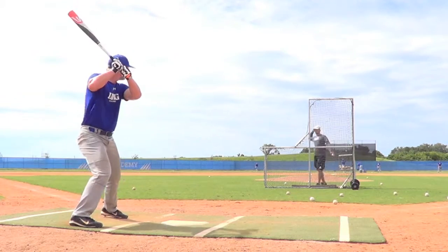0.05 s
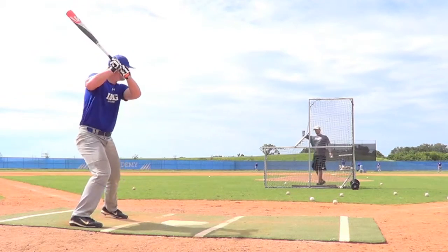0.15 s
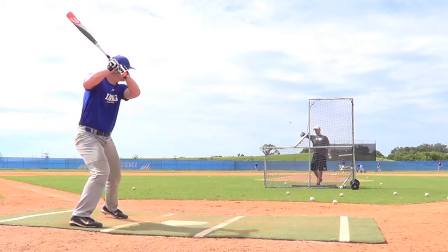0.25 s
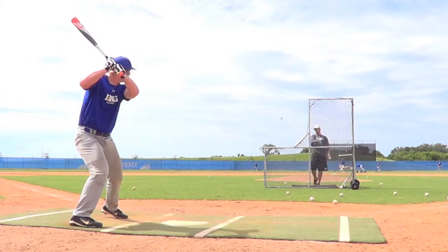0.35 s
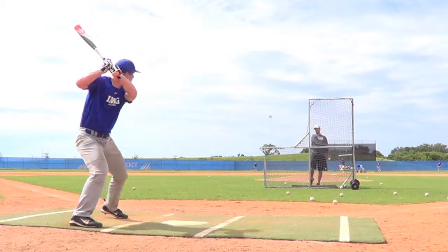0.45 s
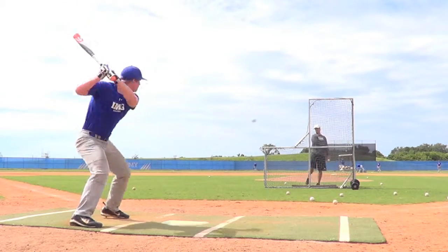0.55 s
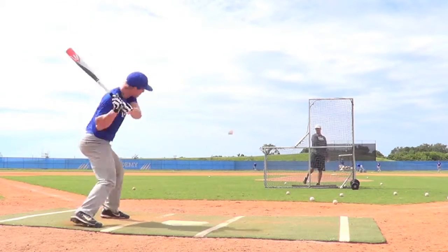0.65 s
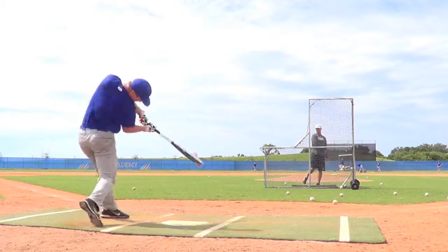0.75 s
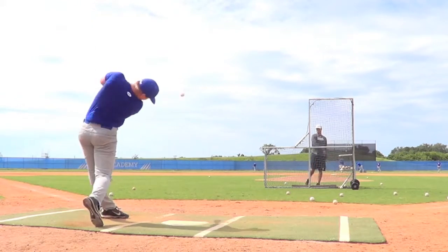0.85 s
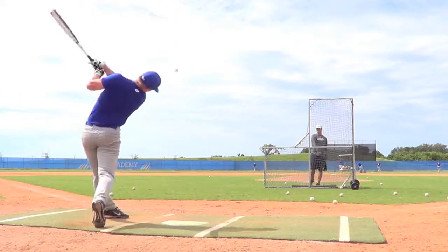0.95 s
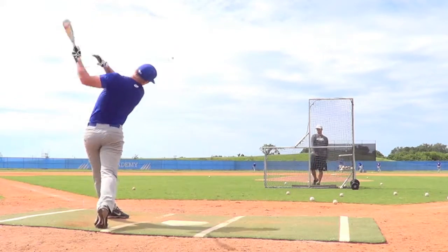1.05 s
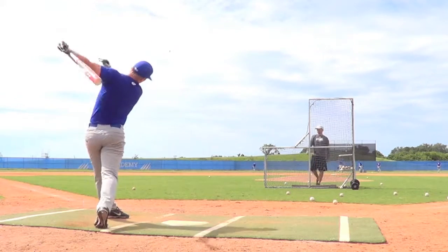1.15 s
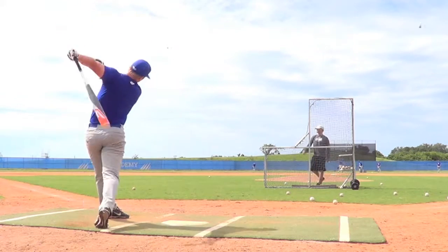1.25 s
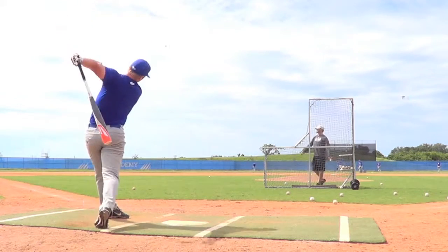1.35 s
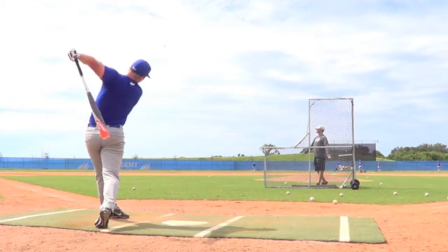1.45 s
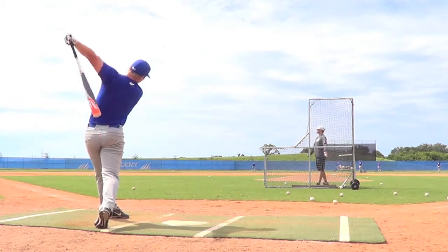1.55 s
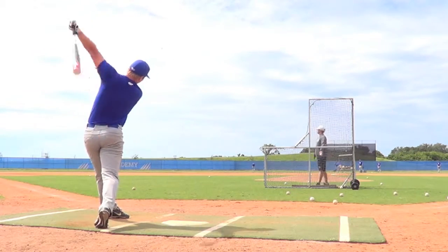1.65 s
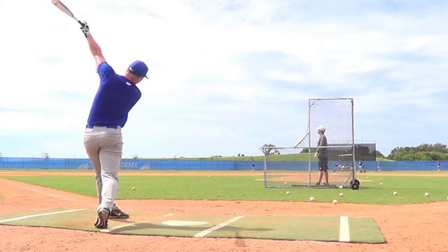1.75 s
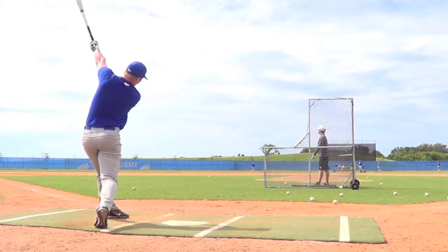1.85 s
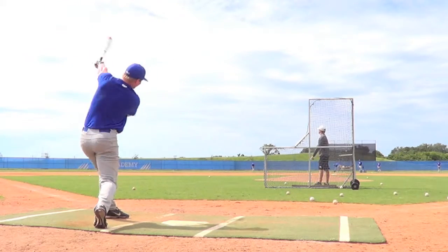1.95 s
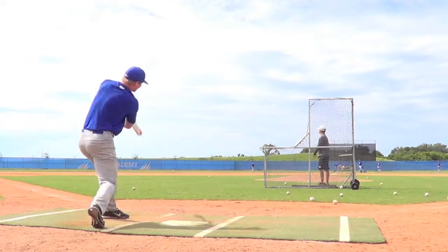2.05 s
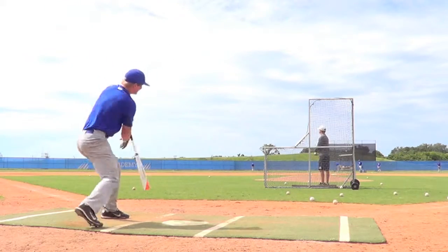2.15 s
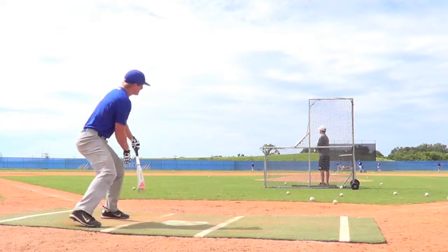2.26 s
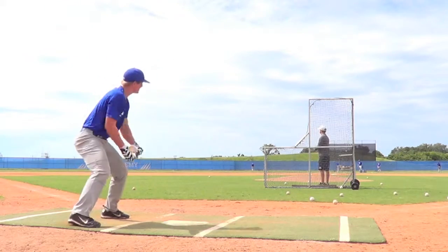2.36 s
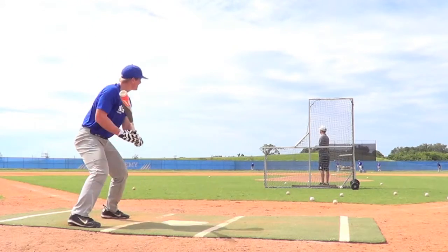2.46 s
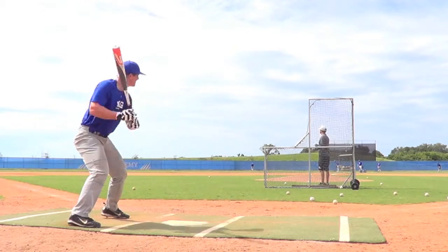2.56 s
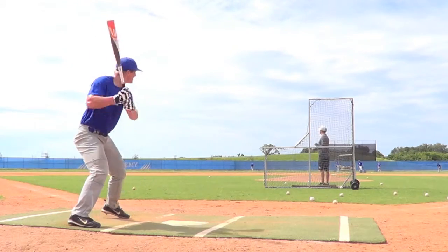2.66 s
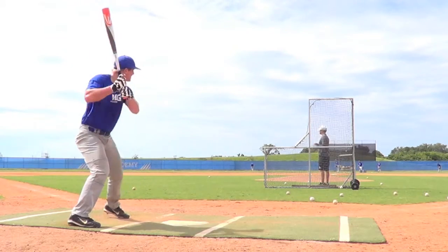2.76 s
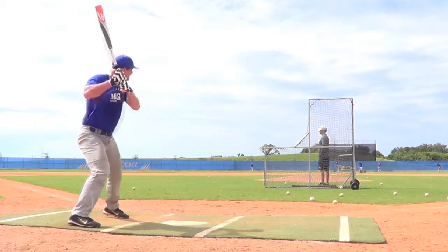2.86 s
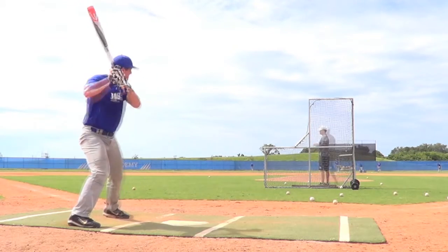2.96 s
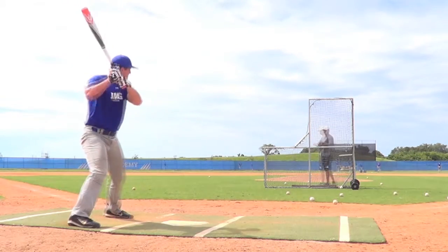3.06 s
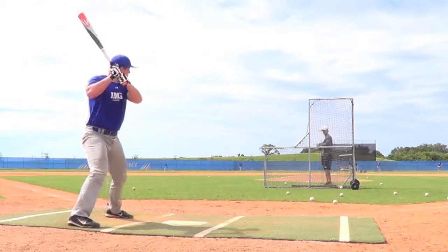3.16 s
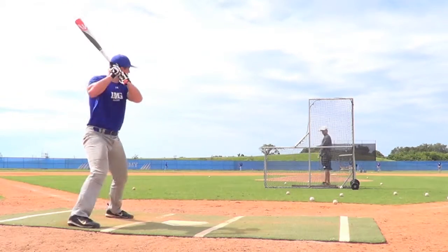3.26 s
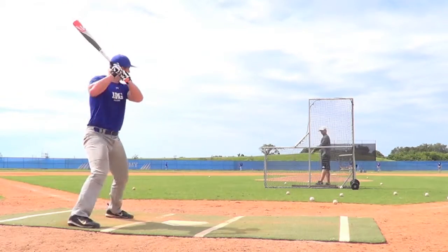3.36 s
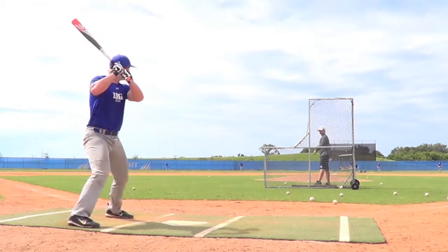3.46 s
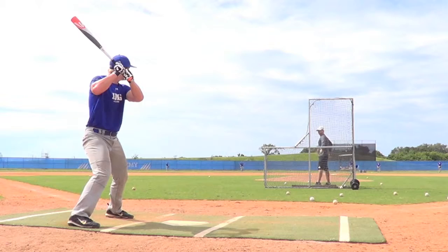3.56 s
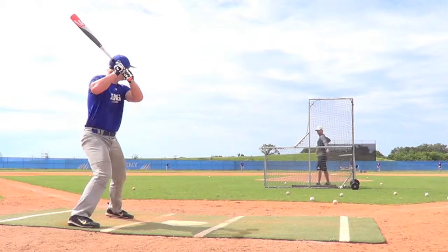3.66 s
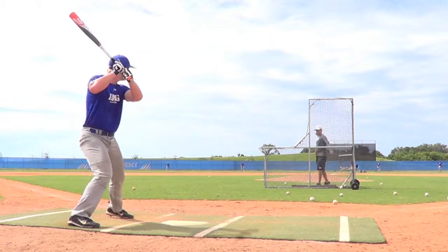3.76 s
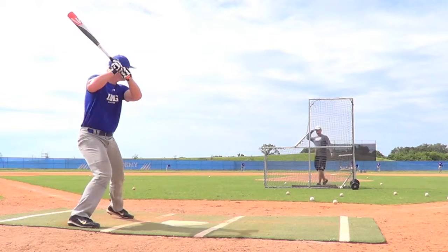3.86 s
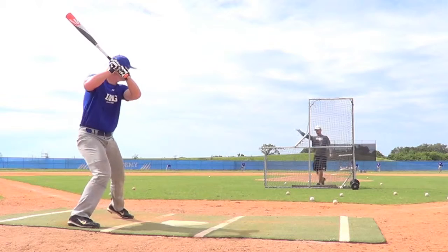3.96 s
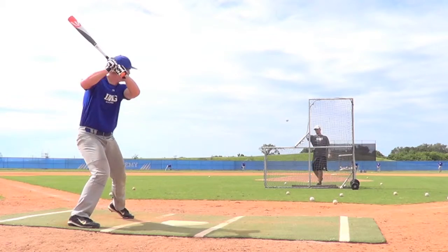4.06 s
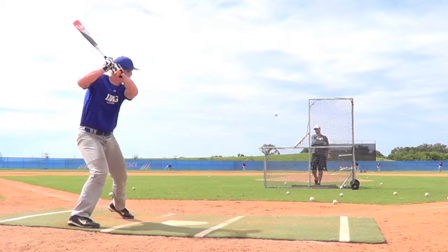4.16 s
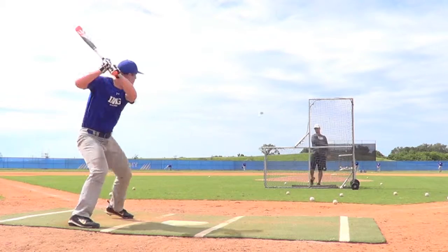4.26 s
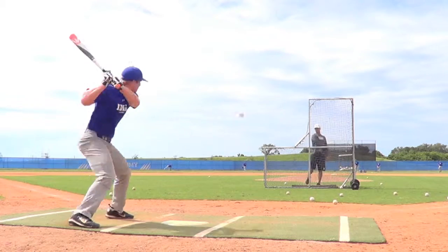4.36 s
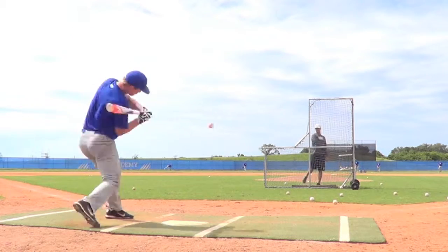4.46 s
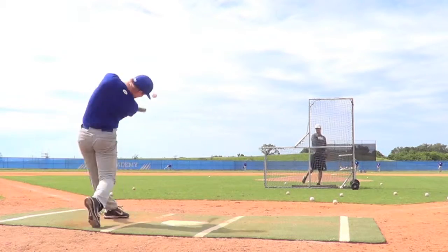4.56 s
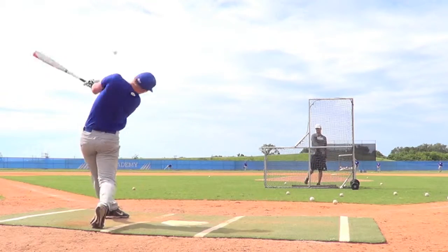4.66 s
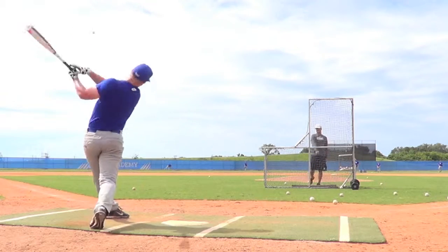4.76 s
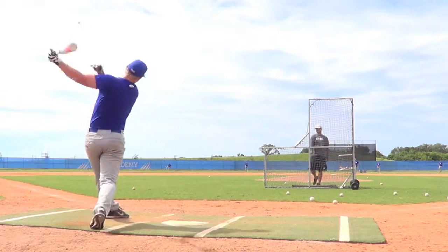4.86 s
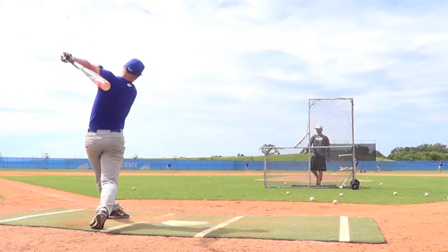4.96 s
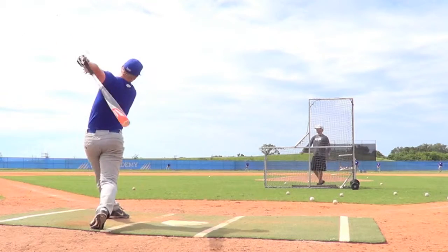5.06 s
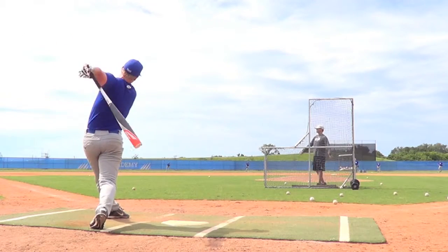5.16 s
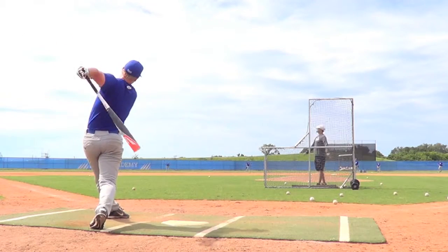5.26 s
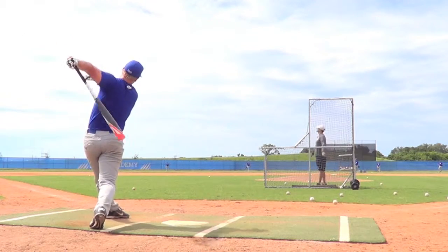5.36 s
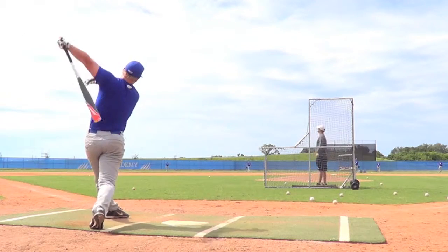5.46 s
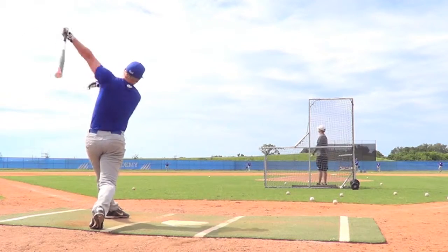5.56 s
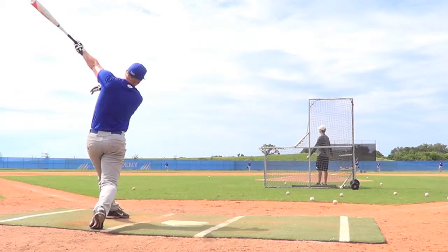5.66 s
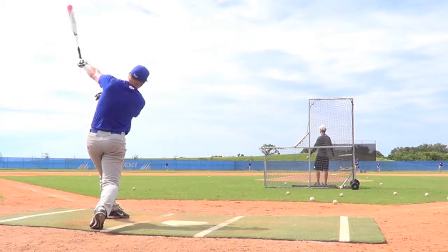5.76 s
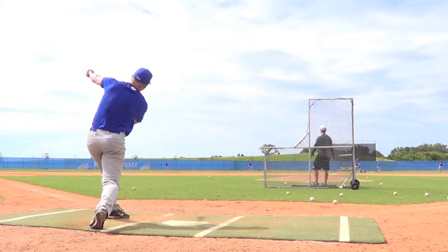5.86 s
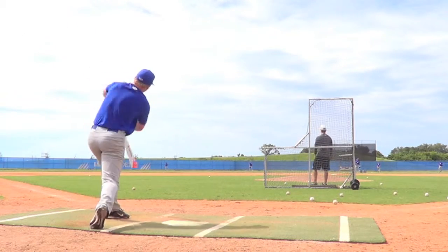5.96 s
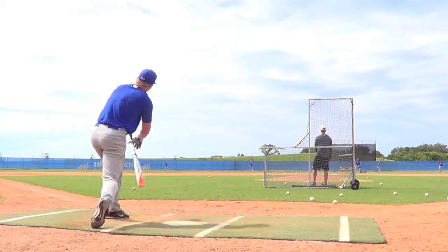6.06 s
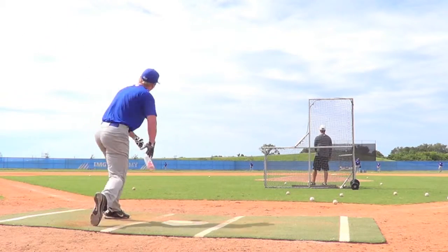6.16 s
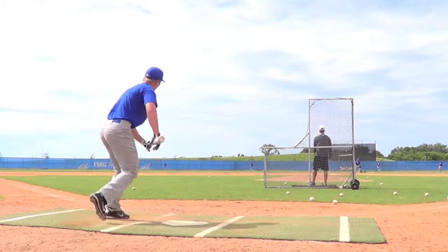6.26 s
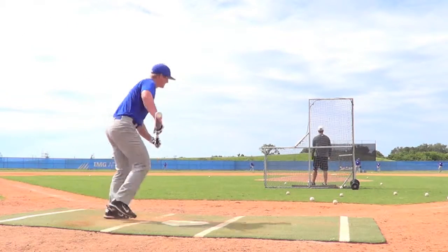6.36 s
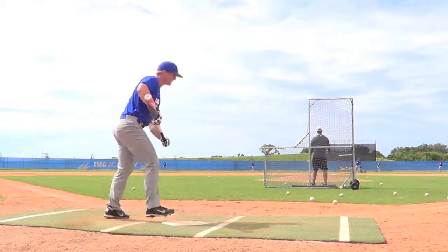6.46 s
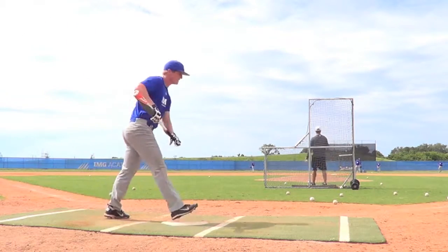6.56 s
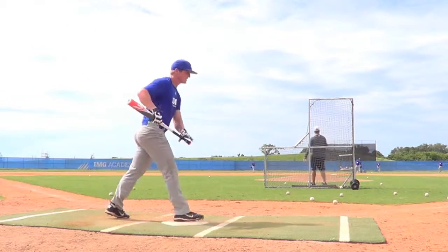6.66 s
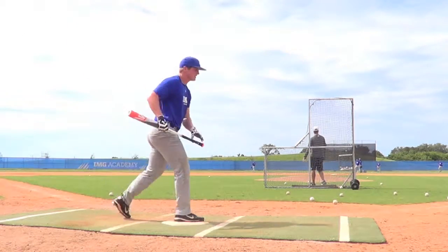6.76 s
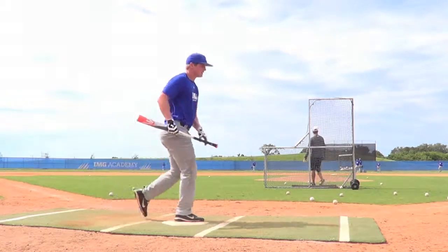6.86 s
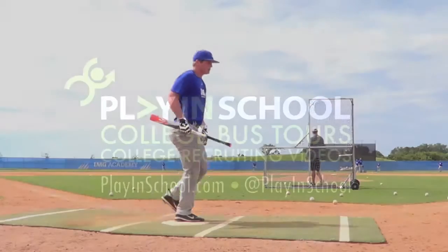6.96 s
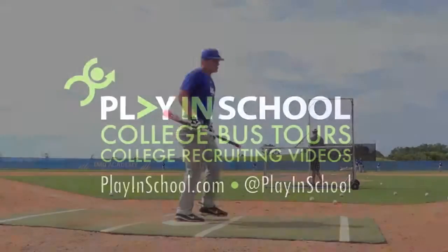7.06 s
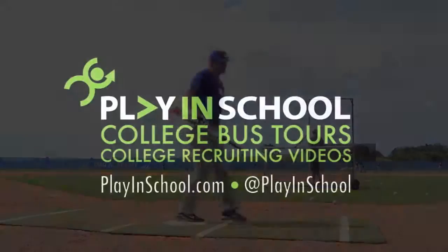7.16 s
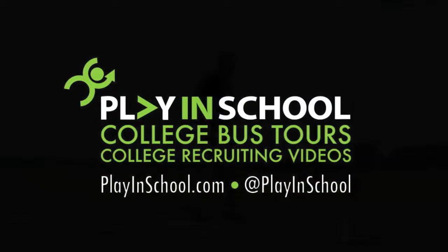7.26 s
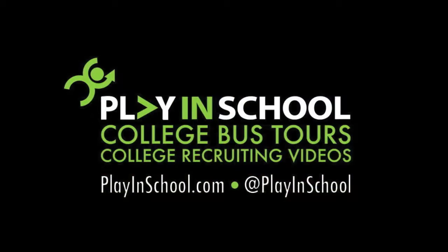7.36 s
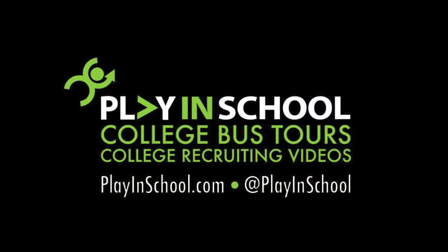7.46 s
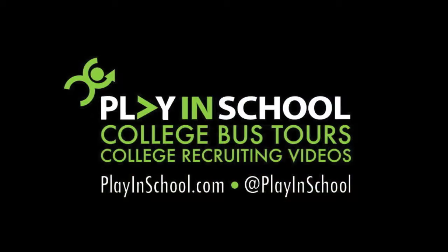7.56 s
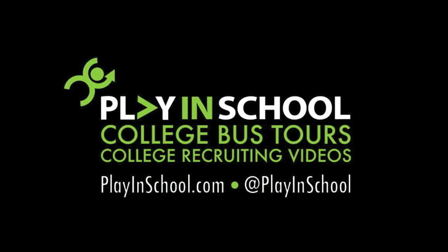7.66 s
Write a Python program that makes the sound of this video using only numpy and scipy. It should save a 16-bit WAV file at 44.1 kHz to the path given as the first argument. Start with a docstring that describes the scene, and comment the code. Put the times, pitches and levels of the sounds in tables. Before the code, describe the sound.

On an open field a batter's soles scuff a gritty mat, then a metal bat hits a ball with a loud crack and high ping, answered by fences and distant walls. Wind thumps and flutters on the microphone. A small metal clack sounds to the right, then a second scrape and hit follow. A bird chirps late, shoes step, and the sound fades.

```python
"""An open field at batting practice: a metal bat hits two balls, and fences and far walls answer each ping.
The bat is a sum of decaying modes with an impact crack; echoes are delayed, smeared and Doppler-shifted copies.
Shoes scrape on a gritty mat and something metal clacks off to the right: shaped noise and struck resonances.
Birds chirp as gliding tones; wind buffets the microphone as noise that grows with the flow.
A limiter ducks the mix under its loudest peaks, and the sound fades out at the end."""
import sys
import numpy as np
from scipy import signal
from scipy.fft import rfft, irfft, next_fast_len
from scipy.io import wavfile
from scipy.ndimage import uniform_filter1d, minimum_filter1d, map_coordinates

SR = 44100
rng = np.random.default_rng(int(sys.argv[2]) if len(sys.argv) > 2 else 0)


def wav_out(sig):
    """Save sig, one row per channel (or a flat mono array), as 16-bit PCM at SR to the path in sys.argv[1]."""
    wavfile.write(sys.argv[1], SR, np.round(np.clip(np.atleast_2d(sig).T, -1, 1) * 32767).astype(np.int16))


N = 339570
T = np.arange(N) / SR


def amp(db):
    """Level definition: decibels to amplitude gain."""
    return 10 ** (np.asarray(db) / 20)


def unit(x):
    """Normalisation to rms 1."""
    return x / np.sqrt(np.mean(x ** 2) + 1e-20)


def along(points, hz):
    """Interpolation of (f/Hz, value) points on a logarithmic frequency axis."""
    f, v = np.transpose(points)
    return np.interp(np.log(hz + 1), np.log(f + 1), v)


def curve(points):
    """Linear interpolation of (t/s, value) points, one value per sample."""
    s, value = np.transpose(points)
    return np.interp(T, s, value)


def random_offset(rate):
    """Random offset: a random value that stays almost constant through the sound."""
    knots = rng.standard_normal(int(N * rate / SR) + 4)
    return map_coordinates(knots, [T * rate / SR], order=2)


def filtered(x, response):
    """Linear filtering: the spectrum of x times a response of frequency."""
    n = x.shape[-1]
    m = next_fast_len(n + 8192)
    return irfft(rfft(x, m) * response(np.fft.rfftfreq(m, 1 / SR)), m)[..., :n]


def colour(x, spectrum):
    """Spectral shaping by (f/Hz, level/dB) points, brought to rms 1."""
    return unit(filtered(x, lambda hz: amp(along(spectrum, hz))))


def grains(n, spiky_db, width=0.24):
    """Granular noise: a stereo train of tiny impacts whose size varies from group to group."""
    size = np.repeat(rng.standard_normal(n // 32 + 1), 32)[:n]
    mid, side = rng.standard_normal((2, n)) * amp(spiky_db * size)
    return unit(np.array([mid + width * side, mid - width * side]))


def pan(db):
    """Interchannel level difference: left and right gains, positive to the left."""
    return amp([[db / 2], [-db / 2]])


def bell(t, centre, spread):
    """Gaussian envelope of height 1, down to 1/e at twice the spread from its centre."""
    return np.exp(-np.minimum(((t - centre) / spread / 2) ** 2, 50))


def add(track, s, sound):
    """Superposition: mix a sound into a track at time s."""
    part = track[..., max(round(s * SR), 0):][..., :sound.shape[-1]]
    part += sound[..., :part.shape[-1]]


def field(x, db, t60):
    """Diffuse scattering: convolution with exponentially decaying noise that builds up smoothly."""
    t = T[:SR]
    tail = rng.standard_normal((2, SR)) * amp(-60 * t / t60) * (1 - np.exp(-(t / 0.024) ** 2))
    return amp(db) * signal.fftconvolve(x, tail / np.linalg.norm(tail[0]), axes=1)[:, :N]


def burst(spectrum, t60, rough):
    """Minimum-phase impulse with a brief ragged tail, in energy equal to 4 ms at rms 1."""
    t = T[:4096]
    cepstrum = irfft(np.log(amp(along(spectrum, np.fft.rfftfreq(len(t), 1 / SR)))))
    # folding the cepstrum forward in time puts the energy at the onset
    cepstrum[1:len(t) // 2] *= 2
    cepstrum[len(t) // 2 + 1:] = 0
    tail = rng.standard_normal(len(t)) * amp(-60 * t / t60)
    ragged = 1 + rough * rfft(tail) / np.linalg.norm(tail)
    out = irfft(np.exp(rfft(cepstrum)) * ragged)
    return out / np.linalg.norm(out) * np.sqrt(.004 * SR)


# spectrum of the open-air hiss: (f/Hz, relative level/dB)
AIR_SPECTRUM = [(530, -2.5), (900, -4.5), (1020, -6.5), (3610, -16), (4160, -17.5), (7940, -21),
                (9700, -20.5), (12900, -24.5), (14000, -22), (15000, -40)]
# course of the hiss, before a small random offset: (t/s, level/dB)
AIR_COURSE = [(0, -44), (.7, -50), (1.7, -52), (2.4, -48.5), (3.1, -54.5), (3.5, -50.5), (7, -52)]
WHINE_HZ = 15734


def air():
    """Broadband background noise: faint hiss, a far insect band that dies away, and a thin high whine."""
    mid, side = colour(rng.standard_normal((2, N)), AIR_SPECTRUM)
    side_tone = [(1000, 1.5), (4000, -2.5), (8000, -5.0), (12000, -41.5)]
    side = filtered(side, lambda hz: amp(along(side_tone, hz)))
    hiss = amp(curve(AIR_COURSE) + 0.83 * random_offset(5)) * np.array([mid + side, mid - side])
    insect_tone = [(3600, -38), (4100, 1.5), (4350, 2), (5000, -34)]
    insect = amp(-58.0) * bell(T, 0.28, 0.22) * colour(rng.standard_normal((2, N)), insect_tone)
    whine = amp(-55.5) * np.sin(2 * np.pi * WHINE_HZ * T + .4 * random_offset(12))
    return hiss + insect + whine


def puffs(count, life):
    """Shot process: small eddies arrive at random and die exponentially."""
    kicks = np.bincount(rng.integers(0, N, count), rng.uniform(0.47, 1, count), N)
    t = T[:SR // 10]
    return signal.fftconvolve(kicks, np.exp(-t / life) * (1 - np.exp(-t / 0.0022)))[:N]


HOWL_DB, HOWL_GROWS = -44, 1.37  # level in a plain breeze; dB gained per dB of wind strength
HOWL_HZ, HOWL_HZ_PER_DB, HOWL_WIDTH_HZ = 617.3, 16, 178
HOWL_OFFSET_HZ = 55  # scale of the random offset of its pitch


def howl(strength_db):
    """Vortex shedding at edges: a hollow noise band climbs in pitch and level with the wind."""
    centre_hz = HOWL_HZ + HOWL_HZ_PER_DB * strength_db + HOWL_OFFSET_HZ * random_offset(9)
    narrow = filtered(rng.standard_normal((2, 2, N)), lambda hz: 1 / (1 + (hz / HOWL_WIDTH_HZ) ** 2))
    in_phase, quadrature = narrow
    phase = 2 * np.pi * np.cumsum(centre_hz) / SR
    band = in_phase * np.cos(phase) + quadrature * np.sin(phase)
    offset_gain = amp(2.5 * random_offset(11) + 1.2 * random_offset(45))
    return amp(HOWL_DB + HOWL_GROWS * strength_db) * unit(offset_gain * band)


# course of the wind: (t/s, strength level/dB)
WIND_COURSE = [(0.0, -47.5), (0.63, -50.5), (0.8, -48), (0.98, -37.5), (1.16, -36.5), (1.45, -53),
               (1.77, -47.5), (2.33, -42.5), (2.61, -47.5), (3.06, -41.5), (3.42, -36), (4.42, -32),
               (4.81, -38.5), (5.3, -31), (5.54, -34.5), (6.66, -28), (6.83, -38.5), (7.05, -34)]
# short gusts and lulls: (t/s, spread t/s, lift level/dB)
GUST_LIFTS = [(0.24, 0.0056, 11), (1.132, 0.016, 8), (1.247, 0.047, 3.5), (1.316, 0.026, 8),
              (1.51, 0.072, 8.5), (1.722, 0.0069, 15), (1.805, 0.014, 14), (2.166, 0.023, 11),
              (2.34, 0.046, 6), (1.98, 0.013, 7), (2.72, 0.079, 1), (2.86, 0.0089, -3), (3.3, 0.02, 5.5),
              (3.57, 0.015, 3.5), (3.81, 0.035, 2.5), (3.962, 0.0091, -6), (5.244, 0.025, 1.5),
              (5.56, 0.019, -8), (6.183, 0.014, -2.5), (6.79, 0.034, 6.5), (7.137, 0.0062, 9)]
# spectrum of the low rumble: (f/Hz, relative level/dB)
BUFFET_SPECTRUM = [(12, -45), (20, -12.5), (59, -0.5), (165, 2), (450, -18.5), (580, -24.5), (990, -120)]
# spectrum of the higher flutter: (f/Hz, relative level/dB)
FLUTTER_SPECTRUM = [(140, -3.5), (265, 5.5), (420, -2), (650, -5.5), (900, -16), (1400, -23.5),
                    (2400, -36.5), (5000, -48.5)]
# spectrum of a hard eddy: (f/Hz, relative level/dB)
EDDY_SPECTRUM = [(150, -8.5), (400, 14.5), (1000, -1.5), (2000, -25.5), (4000, -45), (8000, -53)]
# big eddies thumping the microphone: (t/s, level/dB, f/Hz)
EDDY_THUMPS = [(0.237, -11.5, 132), (0.99, -13.5, 158), (1.104, -16.5, 184), (1.128, -13, 234),
               (1.141, -21, 261), (1.228, -14.5, 165), (1.266, -15.5, 199), (1.306, -10, 171),
               (1.726, -15.5, 168), (1.788, -11, 180), (1.822, -11, 204), (2.16, -31.5, 143),
               (2.866, -10.5, 139), (3.224, -13.5, 175), (3.265, -11.5, 188), (3.29, -11.5, 127),
               (3.77, -13, 143), (3.829, -21.5, 175), (5.221, -11, 195), (5.256, -14.5, 195),
               (5.289, -14, 137), (5.334, -17.5, 168), (5.713, -9, 176), (6.741, -15, 207),
               (6.768, -9.5, 187), (6.785, -9, 255), (6.977, -14, 140), (7.13, -12.5, 176)]
# small fast eddies popping on it: (t/s, level/dB)
EDDY_POPS = [(0.2143, -25.5), (1.104, -24.5), (1.1399, -22), (1.2297, -28), (1.2593, -25.5), (1.321, -24.5),
             (1.787, -28), (2.868, -33.5), (3.2342, -26), (3.237, -20.5), (3.259, -27.5), (3.2644, -23),
             (3.6215, -30.5), (3.7754, -27.5), (4.204, -30), (4.378, -32.5), (5.4375, -27.5),
             (5.963, -28.5), (6.035, -24.5), (6.09, -29.5), (6.151, -32), (6.2, -36.5), (6.4145, -27),
             (6.4868, -22.5), (6.684, -22), (6.7382, -22.5), (6.7898, -18), (6.7997, -21), (6.8488, -22)]
# side against mid, before a common factor of 0.9: (f/Hz, level/dB)
SIDE_WIDTH = [(60, -8), (110, -8.5), (200, -3), (380, 1), (700, 4.5), (1290, 3), (2380, 1.5), (4400, -13),
              (8120, -8.5), (15000, -42)]
BREEZE_DB, BUFFET_KNEE_DB = -35, -31  # plain breeze; strength above which the rumble grows no more
BUFFET_DB, BUFFET_GROWS = -28, 0.47  # level in a plain breeze; dB gained per dB of strength
FLUTTER_DB, FLUTTER_GROWS = -33, 1.2  # the flutter rises much more steeply
STRAY_EDDY_DB, STRAY_EDDY_LIFE_S = -3, 0.0017  # lesser random eddies, relative to the flutter
THUMP_SPREAD_S = 0.0018


def wind():
    """Turbulent pressure on the microphone ports: rumble, flutter, howl, and eddies that thump and pop."""
    flow_db = curve(WIND_COURSE) - BREEZE_DB
    lift_db = sum(db * bell(T, s, spread) for s, spread, db in GUST_LIFTS)
    rumble_flow_db = np.minimum(flow_db, BUFFET_KNEE_DB - BREEZE_DB)
    buffet = amp(BUFFET_DB + BUFFET_GROWS * rumble_flow_db + lift_db)
    flutter = amp(FLUTTER_DB + FLUTTER_GROWS * flow_db + lift_db)
    strays = amp(STRAY_EDDY_DB) * flutter * puffs(count=40, life=STRAY_EDDY_LIFE_S)
    common_offset = random_offset(24)  # shared by rumble and flutter

    def noise(spectrum):
        return colour(rng.standard_normal((2, N)), spectrum)

    low_gain = amp(2.2 * common_offset + 1.1 * random_offset(62))
    low = buffet * unit(low_gain * noise(BUFFET_SPECTRUM))
    high_gain = amp(1.6 * common_offset + .8 * random_offset(9))
    high_puffs = .4 + puffs(count=600, life=0.0036)
    high = flutter * unit(high_gain * high_puffs * noise(FLUTTER_SPECTRUM))
    shared, own = low + high + howl(flow_db) + strays * noise(EDDY_SPECTRUM)
    t = T[:SR // 10] - .05  # time about the centre of a thump
    for s, db, hz in EDDY_THUMPS:
        add(shared, s + t[0], amp(db) * bell(t, 0, THUMP_SPREAD_S) * np.sin(2 * np.pi * hz * t))
    for s, db in EDDY_POPS:
        add(shared, s, amp(db) * burst(EDDY_SPECTRUM, t60=0.025, rough=.6))
    # the same eddy reaches the left port first, so the side signal is a quarter turn ahead
    side = filtered(shared, lambda hz: .9j * amp(along(SIDE_WIDTH, hz)))
    own_tone = [(60, -12.5), (300, -13.0), (1000, -21.5)]
    side += filtered(own, lambda hz: amp(along(own_tone, hz)))
    return np.array([shared + side, shared - side])


# bird notes, before a small random level offset: (t/s, length t/s, start f/Hz, end f/Hz, level/dB)
BIRD_NOTES = [(4.312, 0.047, 6400, 6430, -62), (4.942, 0.073, 6470, 6170, -54),
              (5.458, 0.036, 6350, 6470, -52.5), (6.323, 0.061, 2740, 3310, -32),
              (6.37, 0.034, 3650, 3730, -48.5), (6.422, .025, 6550, 6700, -56),
              (6.732, 0.037, 6550, 6300, -51)]
GLIDE_START, GLIDE_END = 0.225, .85  # shares of a note between which its pitch glides


def birds():
    """Frequency modulation: whistles hold, then glide, with a weak octave; two echoes and scatter follow."""
    out = np.zeros((2, N))
    for s, length, start_hz, end_hz, db in BIRD_NOTES:
        u = np.linspace(0, 1, int(length * SR))
        glide = np.clip((u - GLIDE_START) / (GLIDE_END - GLIDE_START), 0, 1)
        phase = 2 * np.pi * np.cumsum(start_hz + (end_hz - start_hz) * glide) / SR
        swell = np.abs(np.sin(np.pi * u)) ** 1.4
        whistle = np.sin(phase) + amp(-24) * np.sin(2 * phase)
        note = amp(db + 1.5 * random_offset(150)[:len(u)]) * swell * whistle
        for delay, echo_db in [(0, 0), (.05, -11.5), (.11, -20)]:
            add(out, s + delay, amp(echo_db) * note)
    return out + field(out, db=-10, t60=0.45)


# quick metal contacts: (t/s, level/dB, decay time t60/s)
CLACK_BLOWS = [(3.9147, -31.5, 0.026), (3.921, -30.5, 0.039), (3.9248, -33.5, 0.06), (3.938, -42, 0.2)]
# resonances of the small metal thing: (f/Hz, bandwidth f/Hz, relative level/dB)
CLACK_MODES = [(2970, 59, -6), (3800, 110, -4), (4380, 37, -2.5), (5030, 91, -10), (5120, 30, -10),
               (5750, 81, -5.5), (5920, 44, -18), (6200, 63, 1), (7290, 28, -8), (7590, 96, -5.5),
               (8140, 38, -13), (8500, 31, -3), (9580, 75, -3.5), (10600, 32, -5)]


def clack_response(f):
    """Modal superposition: parallel resonances of alternating sign."""
    total = 0
    for k, (centre, width, db) in enumerate(CLACK_MODES):
        resonance = 1j * f * width / (centre * centre - f * f + 1j * f * width)
        total = total + (-1) ** k * amp(db) * resonance
    return total / np.sqrt(np.mean(abs(total) ** 2))


# spectrum of the contact itself: (f/Hz, relative level/dB)
CONTACT_SPECTRUM = [(2000, -26), (2600, -3.5), (2900, -1), (6500, 0.5), (10600, -5.5), (12000, -16),
                    (15000, -21)]
# dull repeats from walls: (delay t/s, level/dB)
WALL_REPEATS = [(0.067, -12), (0.096, -7)]


def clack():
    """Forced resonance: quick contacts snap and ring a small metal thing; two walls repeat it, duller."""
    blows = np.zeros(N)
    for s, db, t60 in CLACK_BLOWS:
        add(blows, s, amp(db - 60 * T[:SR // 2] / t60))
    ring = amp(-2) * filtered(blows * grains(N, spiky_db=0), clack_response)
    near = ring + blows * colour(grains(N, spiky_db=10), CONTACT_SPECTRUM)
    dull_tone = [(3100, 1.5), (3700, -5.5), (9000, -8.5)]
    dull = filtered(near, lambda hz: amp(along(dull_tone, hz)))
    out = near * pan(db=-7.5) + field(near, db=-10.5, t60=0.47) + field(dull, db=-5, t60=0.7)
    for delay, db in WALL_REPEATS:
        add(out, delay, amp(db) * dull)
    return out


# soles twisting and stepping on grit: (t/s, spread t/s, scuff level/dB, grit level/dB)
SOLE_SCRAPES = [(0.684, 0.0025, -36, -67.5), (0.79, 0.002, -40, -58), (0.806, 0.016, -38, -58),
                (0.896, 0.027, -28.5, -34), (2.237, 0.051, -52, -68), (2.512, 0.26, -55, -66),
                (4.528, 0.0033, -31.5, -55.5), (4.54, 0.0078, -34, -58), (4.556, 0.0073, -35, -56),
                (4.565, 0.0043, -43.5, -47), (4.668, 0.021, -23, -34), (4.715, 0.077, -51, -41.5),
                (6.302, 0.037, -49, -54), (6.698, 0.015, -40, -47), (6.796, 0.0071, -33.5, -75)]
# short bright ticks: gritty snaps, and sharp treble echoes of the crack after each hit: (t/s, level/dB)
SHARP_TICKS = [(0.7848, -50), (0.8224, -42), (0.8995, -40), (0.9152, -28.5), (0.9252, -29), (1.0235, -30.5),
               (4.5231, -42), (4.548, -44.5), (4.573, -31.5), (4.657, -15), (4.6835, -19.5),
               (4.6928, -23.5), (4.702, -37.5), (6.3498, -46.5), (6.7082, -35.5), (6.731, -50)]
# spectrum of the scuffing sole: (f/Hz, relative level/dB)
SCUFF_SPECTRUM = [(250, -2.5), (600, -4), (1050, -0.5), (1700, -6.5), (2800, -23.5), (6000, -53.5)]
# spectrum of the crushed grit and the ticks: (f/Hz, relative level/dB)
GRIT_SPECTRUM = [(1000, -23.5), (2500, 3), (5000, 4), (7500, 3), (10500, 2.5), (13000, -7.5),
                 (16000, -27.5)]


def shoes():
    """Friction and granular fracture: soles scuff the mat and crush grit, among short bright ticks."""
    rubbing = sum(amp(db) * bell(T, s, spread) for s, spread, db, _ in SOLE_SCRAPES)
    scuff = rubbing * colour(grains(N, spiky_db=4), SCUFF_SPECTRUM)
    bright = sum(amp(db) * bell(T, s, spread) for s, spread, _, db in SOLE_SCRAPES)
    for s, db in SHARP_TICKS:
        add(bright, s, amp(db - 60 * T[:SR // 10] / 0.017))
    out = scuff * pan(db=9.0) + bright * colour(grains(N, spiky_db=5.0), GRIT_SPECTRUM)
    return out + field(out, db=-13.0, t60=0.33)


# spectrum of the crack thrown back: (f/Hz, relative level/dB)
SPLASH_SPECTRUM = [(300, -8.5), (600, -4), (900, -6), (1150, -7), (1550, 2), (2000, -5.5), (2350, -6),
                   (2750, -8.5), (3100, 2.5), (3800, -15), (6300, -17.5), (10000, -20), (12500, -36.5),
                   (15500, -45)]
# hard slaps that stand out of the echoes: (t/s, level/dB, left-right level/dB)
BOARD_SLAPS = [(0.918, -12.5, 7.5), (0.927, -16, -2), (0.9559, -26, 5.5), (1.004, -28.5, 0),
               (1.0142, -13, 9.5), (1.077, -32, -2), (4.671, -15.5, 7.5), (4.6775, -24.5, 1),
               (4.684, -14, 1), (4.69, -17.5, 12), (4.715, -26.5, 10), (4.7615, -19.5, 3),
               (4.772, -24.5, 11), (4.785, -32, 1)]


def slaps():
    """Specular reflection: flat boards and posts return the crack as single sharp slaps."""
    out = np.zeros((2, N))
    for s, db, side_db in BOARD_SLAPS:
        mid, side = (burst(SPLASH_SPECTRUM, t60=0.013, rough=2.5) for _ in range(2))
        add(out, s, amp(db) * (mid + .5 * np.array([side, -side])) * pan(side_db))
    return out


# bat meets ball: (t/s, ring level/dB, crack level/dB, level/dB of the crack's echoes)
BAT_HITS = [(0.8748, 6, -6, -3), (4.633, 3, -4, -2)]
# spectrum of the crack from one step: (f/Hz, relative level/dB)
STEP_SPECTRUM = [(800, -20.5), (1400, -2.5), (1700, -4), (2000, -3.5), (2550, -4.5), (2830, -3),
                 (3250, -11), (4000, -16.5), (9000, -38.5), (13000, -50.5)]
STEPS_DELAY_S, STEPS_HZ, STEPS_DB = 0.058, 288.4, -27  # first return; returns a second; mean level of the first


def steps():
    """Repetition pitch: a row of evenly spaced faces, like bleacher steps, returns the crack as a buzz."""
    out, face = np.zeros((2, N)), burst(STEP_SPECTRUM, t60=.002, rough=0.12)
    for s, *_ in BAT_HITS:
        for k in range(9):
            gain = amp(STEPS_DB - .3 * k + rng.normal(0, 1))
            add(out, s + STEPS_DELAY_S + k / STEPS_HZ, gain * face * pan(db=14.0))
    return out


# modes of the barrel: (f/Hz, level/dB to the microphone, level/dB to the fences, decay time t60/s)
BARREL_MODES = [(909, -36.5, -17, 0.12), (1375, -31.5, -28.5, 0.073), (1570, -30.5, -27.5, 0.068),
                (3133, -1.5, 0.5, 0.073), (3380, -29, -24.5, 0.095), (4015, -20.5, -34.5, 0.05),
                (4830, -25, -22.5, 0.041)]
# spectrum of ball on barrel: (f/Hz, relative level/dB)
CRACK_SPECTRUM = [(300, -23), (600, -19), (950, -27), (1250, -14), (1600, 1), (2000, -4), (2350, -3),
                  (2750, -9), (3100, 7.5), (3800, -11.5), (6000, -16), (10000, -21.5), (12500, -30.5),
                  (15500, -43)]
# fences, dugout and far walls, alike for every hit:
# (delay t/s, spread t/s, ping level/dB, crack level/dB, left-right level/dB, barrel speed towards it/(m/s))
FAR_SURFACES = [(.043, 0.0016, -10, 10, -2.5, -1), (0.054, 0.0064, -17.5, 9.5, -4, 3),
                (0.057, 0.0034, -15.5, -2, 4, -30.5), (0.072, .006, -19, -7, -1, 0.5),
                (0.118, 0.016, -26, 5.5, 3.5, 1.5), (0.143, 0.0098, -29, -7, 3.5, 28.5),
                (.19, 0.038, -38.5, -1, 4, 0.5), (.202, 0.0027, -29, -20, 4.5, 1.5),
                (.22, 0.0039, -28.5, -13, 4, 1), (.275, .007, -46, -22, 4.5, 26),
                (.415, 0.015, -44.5, -16.5, 3.5, -1.5), (0.482, 0.0017, -42, -25.5, 0, 3),
                (.583, 0.0042, -52, -43, 11, 34.5), (0.656, .002, -55.5, -43.5, 0, 0)]
SOUND_M_PER_S = 343
TWIN_HZ, TWIN_DB, TWIN_T60_S = 3182, -6.5, .13  # the strongest mode has a twin that beats against it
BEAT_TOP_S = 0.0023  # the beat first swells this long after contact


def bat():
    """Modal vibration and Doppler shift: a crack and a beating ping, scattered back as splash and shimmer."""
    out, t = np.zeros((2, N)), T[:SR // 4]
    hz, near_db, far_db, t60 = np.transpose(BARREL_MODES)
    onset = 1 - np.exp(-t / 0.00083)  # the ball stays on the barrel for a moment
    fading = amp(-60 * t / t60[:, None]) * onset

    def ping(db, speed):
        shifted_hz = hz[:, None] * (1 + speed / SOUND_M_PER_S)
        return amp(db) @ (fading * np.sin(2 * np.pi * shifted_hz * t))

    beat_hz = TWIN_HZ - hz[np.argmax(near_db)]
    twin_wave = np.sin(2 * np.pi * (TWIN_HZ * t - beat_hz * BEAT_TOP_S))
    twin = amp(TWIN_DB - 60 * t / TWIN_T60_S) * onset * twin_wave
    for s, ring_db, crack_db, _ in BAT_HITS:
        add(out, s, amp(ring_db) * (ping(near_db, 0) + twin) * pan(db=6.0))
        add(out, s, amp(crack_db) * burst(CRACK_SPECTRUM, t60=0.018, rough=0.84) * pan(db=7))
    splashes, middle = np.zeros((2, N)), t[-1] / 2
    for delay, spread, ping_db, splash_db, side_db, speed in FAR_SURFACES:
        swell = bell(t, middle, spread)
        swell = swell / np.linalg.norm(swell) * pan(side_db)
        shifted = ping(far_db, speed)[None]
        for s, ring_db, _, echo_db in BAT_HITS:
            scatter = swell * grains(len(t), spiky_db=1.5, width=0.25)
            shimmer = signal.fftconvolve(shifted, scatter, axes=1)
            # scattering keeps the energy
            shimmer *= np.linalg.norm(shifted) / np.linalg.norm(shimmer, axis=1).mean()
            add(out, s + delay - middle, amp(ring_db + ping_db) * shimmer)
            add(splashes, s + delay - middle, amp(echo_db + splash_db) * swell)
    out += splashes * colour(grains(N, spiky_db=3, width=.6), SPLASH_SPECTRUM)
    out += steps() + slaps()
    return out + field(out, db=-26.5, t60=1.15)


def scene():
    """Superposition of everything that reaches the microphone."""
    return bat() + shoes() + clack() + birds() + wind() + air()


def limiter(x, ceiling_db, release_db_per_s):
    """Peak limiting: the gain drops under a peak and climbs back steadily in dB."""
    over = np.maximum(20 * np.log10(np.abs(x).max(axis=0) + 1e-9) - ceiling_db, 0)
    cut = np.maximum.accumulate(over + release_db_per_s * T) - release_db_per_s * T
    # a short window about each sample rounds the drop off
    return x * uniform_filter1d(minimum_filter1d(amp(-cut), size=25), size=25)


TOP_HZ = 16100


def record(dry):
    """Gain control and band limitation: limiter, closing fade, and nothing above the top frequency."""
    fade = np.interp(T, [6.97, 7.2, 7.34], [1, .4, 0])
    out = fade * limiter(dry, ceiling_db=-3.0, release_db_per_s=196.0)
    return filtered(out, lambda hz: hz < TOP_HZ)


dry = scene()
out = record(dry)
wav_out(out)
```